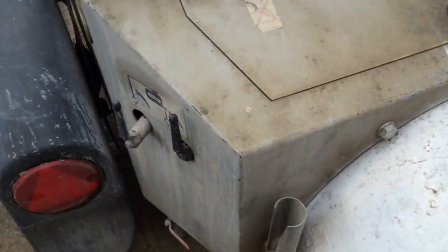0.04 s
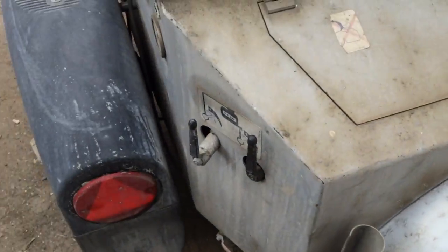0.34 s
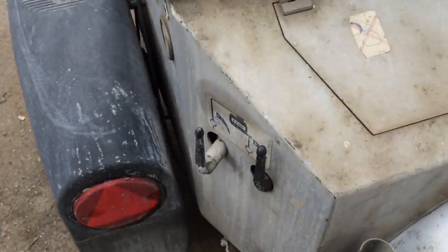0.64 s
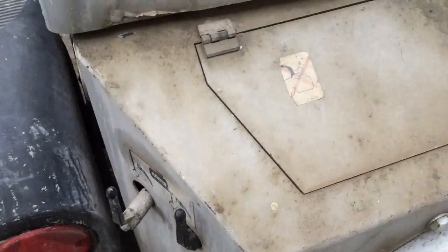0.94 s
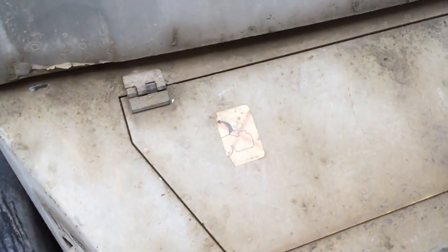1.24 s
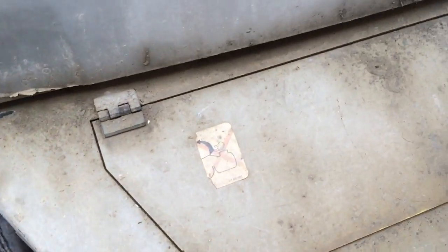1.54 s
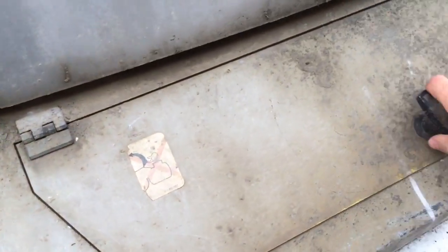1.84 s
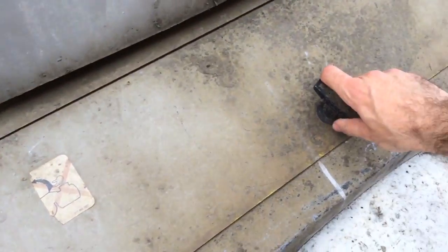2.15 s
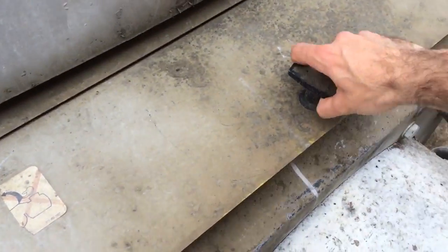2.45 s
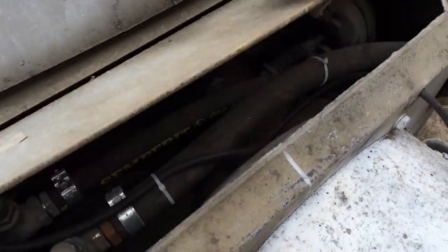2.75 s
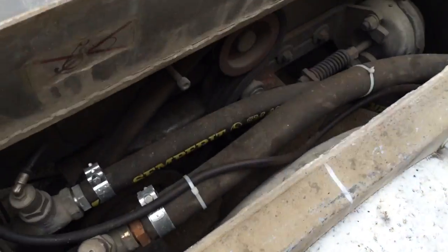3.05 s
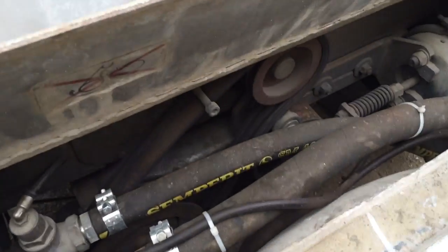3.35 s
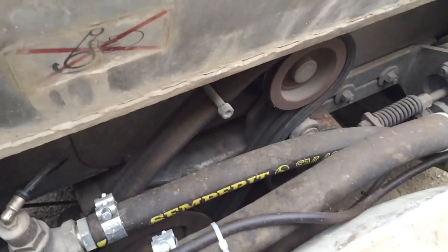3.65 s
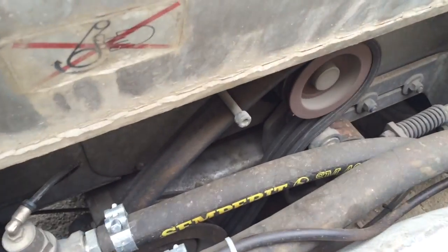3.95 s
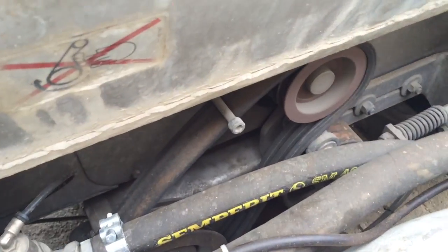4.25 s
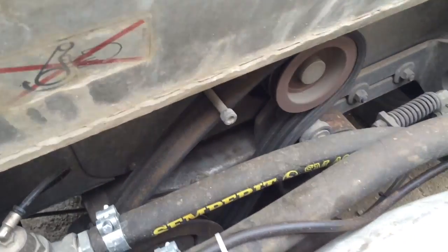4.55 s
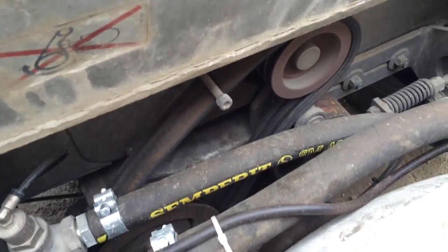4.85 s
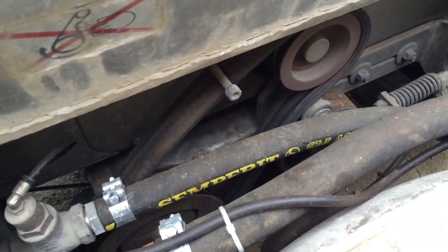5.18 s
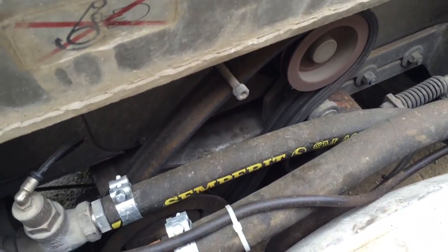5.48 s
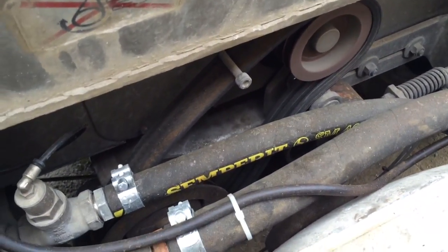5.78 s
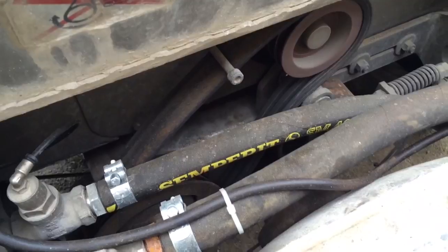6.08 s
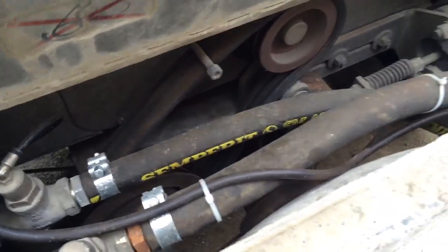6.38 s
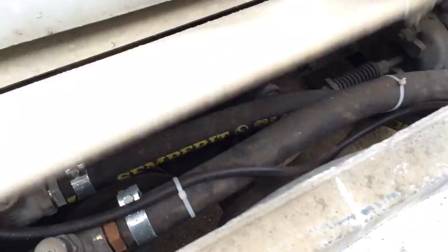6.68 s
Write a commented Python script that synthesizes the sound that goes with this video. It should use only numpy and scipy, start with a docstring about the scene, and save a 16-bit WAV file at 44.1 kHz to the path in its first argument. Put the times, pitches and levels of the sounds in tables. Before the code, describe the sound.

Close up outdoors, a diesel pump machine hums and rumbles without a break, with a metallic clatter and a strong, steady air hiss on top. Its sheet metal housing knocks lightly at the start. Then a hinge scrapes briefly and a hatch bumps a few times as it opens, letting the drone and ringing of the engine come through slightly fuller. The machine keeps the same speed throughout.

```python
"""A diesel engine drives a screed pump at a steady speed, under a loud hiss of rushing air.
The engine drones on multiples of its cycle rate, combustion and valve gear ring the block, and the
exhaust rumbles. The tone shifts as the microphone moves over the steel housing, whose sheet metal
knocks now and then. A hand lifts a hatch: the hinge scrapes, the hatch knocks a few times, and the
exhaust drone and the ringing of the machine come out more directly."""
import sys
import numpy as np
from scipy import signal
from scipy.fft import rfft, irfft
from scipy.io import wavfile
from scipy.ndimage import uniform_filter1d, minimum_filter1d, map_coordinates

SR = 44100
rng = np.random.default_rng(int(sys.argv[2]) if len(sys.argv) > 2 else 0)


def put_to_file(sound):
    """Save the sound as 16-bit audio at rate SR, in the file named by the first command-line argument."""
    columns = np.atleast_2d(sound).T  # one column per channel
    safe = np.clip(columns, -1, 1)
    whole_steps = np.round(safe * 32767)
    wavfile.write(sys.argv[1], SR, whole_steps.astype(np.int16))


N = 300762
FRAME, HOP = 2048, 512
TIME = np.arange(N) / SR
FRAME_S = np.arange(N // HOP + 5) * HOP / SR
BIN_HZ = np.fft.rfftfreq(FRAME, 1 / SR)
CYCLE_HZ = 18.49  # engine cycles a second, three firings in each

# Moves of hand and microphone. Each: start, fade-in time, start of release, release time, in seconds.
HATCH_LIFT = (2.35, 0.44, 2.9, 0.32)  # the hand takes the hatch's weight and raises it
HATCH_OPEN = (3.05, .57, 6.24, 2.0)  # the hatch swings open and later begins to close
BESIDE_WALL = (-0.51, 1.35, 1.23, 0.21)  # the microphone passes close to the side of the machine
OVER_LID = (.1, 1.3, 2.6, .5)  # it moves in over the humming lid
OVER_GAP = (1.85, .65, 3.3, .28)  # and over the gap at the edge of the hatch
# Side-wall echoes. Each: starting comb spacing in Hz, relative growth of the delay per second, strength.
NEAR_ECHO, FAR_ECHO = (2440, .07, 0.24), (860, .19, .19)


def engine_drone(cycles, weak_db=-55, scatter_db=3.0, uneven_db=1.7, lid_hz=182, lid_width_hz=45):
    """Harmonics of the engine cycle; exhaust and housing favour some, the rest stay weak."""
    # The favoured harmonics. Each row: multiple of the cycle rate, level in dB with the hatch shut,
    # level in dB with it open.
    orders = [(2, -54, -50), (3, -36.5, -33.5), (4, -38.5, -42.5), (5, -49, -51), (6, -44.5, -35.5),
              (8, -38, -35), (10, -35, -35), (11, -40.5, -37), (12, -49, -46), (14, -65, -54),
              (15, -53, -42), (17, -44, -41.5), (20, -43, -53), (21, -46.5, -45.5), (22, -64, -46.5),
              (23, -64, -47), (24, -54, -55), (25, -59, -48), (26, -50, -49), (27, -47.5, -53),
              (30, -64.5, -47.5), (33, -67, -46), (37, -52, -51), (39, -42.5, -44), (40, -47, -44),
              (42, -48, -44), (43, -51, -41), (44, -62, -48), (45, -56, -51), (48, -54, -47)]
    strong = {round(k): (shut, opened) for k, shut, opened in orders}
    start, approach = OVER_LID[:2]
    away = np.clip(1 - (TIME - start) / approach, 0, 1)
    lid_hum = gain_of(-12 * away + 2 * movement(OVER_LID, TIME)) - 1  # grows as the lid comes near
    out = np.zeros(N)
    for k in range(2, 64):
        faint_db = weak_db + scatter_db * rng.standard_normal()
        level = with_hatch(gain_of(strong.get(k, (faint_db, faint_db))), TIME)
        lid_resonance = 1 + lid_hum * np.exp(-((k * CYCLE_HZ - lid_hz) / lid_width_hz) ** 2)
        out += level * lid_resonance * np.cos(2 * np.pi * (k * cycles + rng.random()))
    ride_db = with_hatch((0.1, 0), TIME) - 4 * movement(HATCH_LIFT, TIME)  # dips during the lift
    return np.sqrt(2) * out * gain_of(ride_db + uneven_db * wander(28))


def block_clatter(cycles, shut_open_db=(-18, -16.5), regular_share=0.22, cover_hz=2050):
    """Combustion and valve gear keep the block's many close modes ringing; part repeats every cycle."""
    # The clatter's tone. Each row: frequency in Hz, relative dB with the hatch shut, with it open.
    spectrum = [(300, -78, -85), (560, -62.5, -60), (800, -55.5, -58), (1074, -52, -51), (1520, -52.5, -49),
                (1780, -47, -47.5), (2140, -50.5, -49.5), (2437, -59, -59), (2830, -63, -68.5),
                (3600, -100, -100)]
    # Resonances of block and covers. Each row: centre in Hz, width in Hz, boost in dB shut, and open.
    block_modes = [(722, 48, 4, 5), (780, 31, -1.5, 0), (1090, 41, 5.5, 3.5), (1156, 32, 0, 6.5),
                   (1235, 19, 5.5, 2), (1321, 72, 5, 3), (1550, 28, 7, 3), (1603, 62, 0, 6.5),
                   (1650, 27, 4, 3), (1802, 50, 1.5, 6.5), (1860, 15, 2.5, 1), (1925, 45, 4, 5.5),
                   (2164, 43, 5.5, 6.5), (2210, 18, -6, 1.2), (2306, 86, -4, 0.5), (2345, 25, 8, 8.5),
                   (2500, 66, 3, 3), (2680, 36, 3.5, 9)]
    tone_db = housing_colour(spectrum, block_modes) + 2.5 * patches(frames_size=60, bins_size=1)
    blows = rng.standard_normal(round(SR / CYCLE_HZ))  # one cycle's worth, looped at engine speed
    loop = unit_rms(np.interp(cycles, np.arange(len(blows)) / len(blows), blows, period=1))
    loop_spectra = signal.stft(loop, nperseg=FRAME, noverlap=FRAME - HOP)[2]
    repeating = from_spectra(loop_spectra * gain_of(tone_db[:loop_spectra.shape[1]].T))
    ringing = np.sqrt(regular_share) * repeating + np.sqrt(1 - regular_share) * shaped_noise(tone_db)
    firing = 0.032 * np.cos(2 * np.pi * 3 * cycles)
    limp = 0.026 * np.cos(2 * np.pi * cycles)
    # The clatter swells as the panel's band sweeps through the ring of the covers.
    swell_db = 2 * np.exp(-((panel_centre(TIME) - cover_hz) / 190) ** 2)
    level_db = with_hatch(shut_open_db, TIME) + swell_db + 0.38 * wander(22)
    return ringing * (1 + firing + limp) * gain_of(level_db)


def exhaust_rumble(cycles, shut_open_db=(-32, -29.5), throb=0.093):
    """Turbulent exhaust and shaking panels, swelling once a cycle."""
    # The rumble's tone. Each row: frequency in Hz, relative dB with the hatch shut, with it open.
    spectrum = [(15, -73, -72), (35, -67, -63), (60, -53, -46), (110, -54, -52), (162, -48, -45),
                (235, -59, -54), (336, -52, -50.5), (430, -54, -57), (550, -58, -58.5), (800, -79, -81),
                (1500, -100, -100)]
    turbulence = shaped_noise(housing_colour(spectrum))
    return gain_of(with_hatch(shut_open_db, TIME)) * turbulence * (1 + throb * np.cos(2 * np.pi * cycles))


def crank_cycles(hunt=0.00121, shake=0.0021):
    """Running count of engine cycles; the governor hunts slightly and the firings are uneven."""
    return np.cumsum(CYCLE_HZ * (1 + hunt * wander(1.96) + shake * wander(15))) / SR


def air_hiss(ripple_db=1.5, flutter_db=0.54, split_hz=7600):
    """Rushing air; reflections in the housing ripple its spectrum, and its top end is beamed."""
    # The hiss's tone. Each row: frequency in Hz, relative dB with the hatch shut, with it open.
    spectrum = [(1800, -100, -100), (2870, -65, -65), (3220, -56, -61), (4420, -55, -55),
                (5960, -48.5, -50.5), (7260, -53, -52.0), (7970, -55.5, -58.2), (10400, -58, -59.7),
                (12270, -63.5, -65.5), (13300, -66, -70.4), (15700, -69, -70)]
    # The housing's peaks and notches. Each row: centre in Hz, width in Hz, gain in dB shut, and open.
    housing_modes = [(3215, 240, 1, 5.5), (3590, 213, 3.5, 7.5), (3770, 79, 4, 0.5), (3995, 350, 3, 3.8),
                     (4352, 57, 7.5, -8), (4770, 68, 5.5, 0.3), (5460, 116, -2.5, -6),
                     (5830, 163, -3.5, -5), (6140, 82, -0.5, -3), (6230, 93, 1.5, -17),
                     (6469, 440, -2, 2.1), (6835, 130, 5.5, -9), (7400, 200, 4.5, 0), (8580, 73, 6.5, 4),
                     (8910, 140, 4.8, 6.5), (9210, 190, 5, -1), (9600, 113, -4, -5.4), (10940, 160, 2, 3),
                     (11400, 231, 3.5, -0.5), (11900, 298, -1, -1), (12207, 196, 0, 2.1)]
    # The ring of the hatch gap. Each row: centre in Hz, width in Hz, gain in dB before gap_amount.
    gap_modes = [(3530, 260, -0.5), (4800, 350, 1.5), (7360, 340, 1.5), (9130, 280, 4), (11200, 450, 1.5)]
    # The air's level ride. Each row: time in seconds, level of the body in dB, of the top end in dB.
    level_ride = [(0, -12.5, -20), (.65, -15.7, -18.5), (1.3, -16, -21), (1.6, -17, -20),
                  (1.92, -14.5, -18), (3.18, -14, -19), (3.75, -16.5, -21.5), (6.0, -16.4, -21),
                  (6.82, -15, -20)]
    gap_amount = with_hatch((-.45, .05), FRAME_S) + 1.25 * movement(OVER_GAP, FRAME_S)
    tone_db = housing_colour(spectrum, housing_modes)
    tone_db += gap_amount[:, None] * sum(db * bell(hz, width) for hz, width, db in gap_modes)
    tone_db += ripple_db * reflection_ripple(frames_size=90, bins_size=5)
    tone_db += 1.8 * patches(frames_size=70, bins_size=1)  # slow, narrow grain
    tone_db += 0.7 * patches(frames_size=6, bins_size=40)  # quick, broad flicker
    # Shelve the top end so that its balance with the body follows the ride.
    body_db, top_db = follow(level_ride, FRAME_S)
    shelf = (1 + np.tanh((BIN_HZ - split_hz) / 500)) / 2
    power = gain_of(tone_db) ** 2
    beam_db = top_db - body_db - 10 * np.log10((power @ shelf) / (power @ (1 - shelf)))
    air = shaped_noise(tone_db + beam_db[:, None] * shelf)
    body, top = gain_of(follow(level_ride, TIME))
    return air * np.hypot(body, top) * gain_of(flutter_db * wander(32))


def metal_knocks(push_gain=0.96, ring_gain=0.51):
    """Single blows on the sheet metal: one short push of the panel, and its ring."""
    # Knocks on housing and hatch. Each row: start in seconds, level in dB, centre of the blow in Hz.
    hits = [(.07, -13, 448), (.15, -19, 150), (2.466, -18, 160), (2.507, -18.5, 180), (2.69, -14.5, 300),
            (2.72, -22, 110), (2.875, -14.5, 420), (2.92, -10.5, 231), (3.251, -18, 150), (6.5, -19, 130)]
    out = np.zeros(N)
    for start, db, centre_hz in hits:
        ring = hatch_ring(centre_hz)
        phase = 2 * np.pi * centre_hz * np.arange(len(ring)) / SR - np.pi
        push = -phase * np.exp((1 - phase ** 2) / 2)
        blow = gain_of(db) * (ring_gain * ring + push_gain * push)
        slot = out[round(start * SR):][:len(blow)]
        slot += blow[:len(slot)]
    return out


def hinge_scrape(free_s=2.88, level_db=-25, rise_db_per_s=42, fall_db_per_s=88, slips_per_s=220):
    """Small random slips of the hinge ring the hatch, harder and harder until it comes free."""
    slips = rng.standard_normal(N) * (rng.random(N) < slips_per_s / SR)
    scraping = unit_rms(signal.oaconvolve(slips, hatch_ring(centre_hz=500))[:N])
    fade_db = np.maximum(rise_db_per_s * (free_s - TIME), fall_db_per_s * (TIME - free_s))
    return scraping * gain_of(level_db - fade_db)


def hatch_ring(centre_hz, spread=0.54):
    """A blow rings the hatch modes that lie near its own centre; peak 1."""
    # The hatch's modes. Each row: frequency in Hz, relative level in dB, seconds to decay by 60 dB.
    hatch_modes = [(85, -5, .09), (136, -1, 0.092), (174, 3.5, 0.15), (254, -9, 0.065), (329, 0, .08),
                   (407, 1.5, 0.06), (470, 1, 0.058), (686, -12, .05), (1100, -8, .04)]
    t = np.arange(SR // 4) / SR
    ring = np.zeros(len(t))
    for hz, db, t60 in hatch_modes:
        excitation = np.exp(-(np.log(hz / centre_hz) / spread) ** 2)
        ring += excitation * gain_of(db - 60 * t / t60) * np.sin(2 * np.pi * hz * t)
    return ring / abs(ring).max()


def housing_colour(spectrum, modes=(), panel_db=4, flank_db=-0.9, flank_ratio=1.59):
    """Moving EQ in dB of a source heard through the housing as the hatch opens, with wall echoes."""
    hz, *states = np.transpose(spectrum)
    shut, opened = (np.interp(np.log(BIN_HZ + 1), np.log(hz), db) for db in states)
    for centre, width, shut_db, open_db in modes:
        shut = shut + shut_db * bell(centre, width)
        opened = opened + open_db * bell(centre, width)
    t = FRAME_S[:, None]
    # With the hatch shut, the nearest panel lifts one broad band and shades its flanks.
    for ratio, db in ((1, panel_db), (flank_ratio, flank_db), (1 / flank_ratio, flank_db)):
        centre = ratio * panel_centre(t)
        shut = shut + db * bell(centre, 0.23 * centre)
    return with_hatch((shut, opened), t) + wall_echo()


def panel_centre(t, low_hz=1566, high_hz=3480, start_s=0.94, octaves_per_s=0.61):
    """Hz of the band that the nearest panel lifts; it climbs as the microphone crosses the lid."""
    return np.minimum(low_hz * 2 ** (octaves_per_s * np.maximum(t - start_s, 0)), high_hz)


def wall_echo(scatter_hz=9500):
    """Moving comb filter in dB: two side-wall echoes join the direct sound, the near one inverted."""
    near, far = (echo[2] * np.exp(2j * np.pi * BIN_HZ / comb_spacing(echo))
                 for echo in (NEAR_ECHO, FAR_ECHO))
    mirrored = 1 / (1 + (BIN_HZ / scatter_hz) ** 4)
    return 20 * np.log10(abs(1 + movement(BESIDE_WALL, FRAME_S[:, None]) * mirrored * (far - near)))


def reflection_ripple(frames_size, bins_size):
    """Fine ripple from many reflections; it slides along with the comb as the microphone moves."""
    spacing = comb_spacing(NEAR_ECHO)
    sliding_bins = np.arange(len(BIN_HZ)) * spacing.min() / spacing
    grid = np.broadcast_arrays(np.arange(len(FRAME_S))[:, None], sliding_bins)
    return unit_rms(map_coordinates(patches(frames_size, bins_size), grid, order=1, mode="nearest"))


def comb_spacing(echo, recede_until_s=1.9):
    """Hz between the teeth of an echo's comb; they close up as the microphone leaves the wall."""
    first_hz, growth, _ = echo
    return first_hz / (1 + growth * np.minimum(FRAME_S[:, None], recede_until_s))


def movement(move, t):
    """Envelope of a move at the times t, 0-1: it fades in, holds and releases."""
    start, attack, end, release = move
    return np.clip(np.minimum((t - start) / attack, 1 - (t - end) / release), 0, 1)


def with_hatch(states, t):
    """Crossfades a value from its shut to its open state as the hatch swings."""
    shut, opened = states
    return shut + movement(HATCH_OPEN, t) * (opened - shut)


def shaped_noise(tone_db):
    """Noise of constant power with the given moving spectrum."""
    size = gain_of(tone_db)
    size = size / np.linalg.norm(size, axis=1, keepdims=True)
    spectra = size * (rng.standard_normal(size.shape) + 1j * rng.standard_normal(size.shape))
    return from_spectra(spectra.T)


def from_spectra(spectra):
    """Overlaps short spectra into a sound of rms 1."""
    return unit_rms(signal.istft(spectra, nperseg=FRAME, noverlap=FRAME - HOP)[1][:N])


def wander(hz):
    """Random drift of rms 1, rolling off above hz."""
    f = np.fft.rfftfreq(N, 1 / SR)
    return unit_rms(irfft(rfft(rng.standard_normal(N)) * np.exp(-(f / hz) ** 2) * (f > 0), N))


def patches(frames_size, bins_size):
    """Random patches of rms 1 over time and frequency."""
    speckle = rng.standard_normal((len(FRAME_S), len(BIN_HZ)))
    return unit_rms(uniform_filter1d(uniform_filter1d(speckle, frames_size, 0), bins_size, 1))


def bell(hz, width):
    """An EQ bell of height 1, width taken at half height."""
    return np.exp(-np.log(16) * ((BIN_HZ - hz) / width) ** 2)


def follow(table, t):
    """Every value column of a curve at the times t."""
    seconds, *columns = np.transpose(table)
    return [np.interp(t, seconds, column) for column in columns]


def gain_of(db):
    """Decibels to amplitude."""
    return 10 ** (np.asarray(db) / 20)


def unit_rms(x):
    """Scales to rms 1."""
    return x / np.sqrt(np.mean(x ** 2) + 1e-20)


def scene():
    """Engine, air and hatch in mono, the same on both channels."""
    cycles = crank_cycles()
    engine = engine_drone(cycles) + exhaust_rumble(cycles) + block_clatter(cycles)
    mono = engine + air_hiss() + metal_knocks() + hinge_scrape()
    return np.array([mono, mono])


def record(dry, ceiling=.76, cutoff_hz=15350):
    """A quick limiter holds the highest peaks down; a steep low-pass trims the top."""
    needed_gain = np.minimum(1, ceiling / (abs(dry).max(0) + 1e-9))
    limited = dry * uniform_filter1d(minimum_filter1d(needed_gain, size=65), size=65)
    lowpass = signal.firwin(801, cutoff_hz, window=("kaiser", 9), fs=SR)
    return signal.oaconvolve(limited, lowpass[None], "same", axes=1)


dry = scene()
out = record(dry)
put_to_file(out)
```